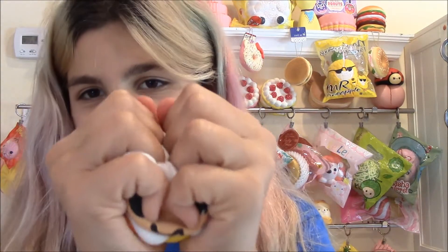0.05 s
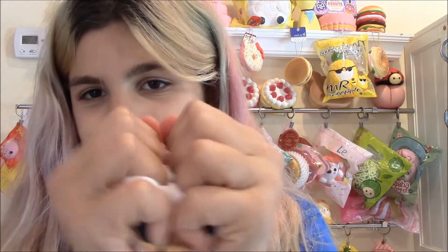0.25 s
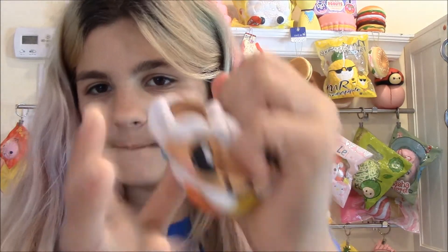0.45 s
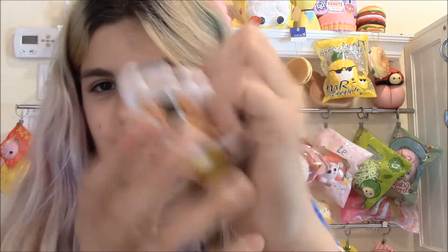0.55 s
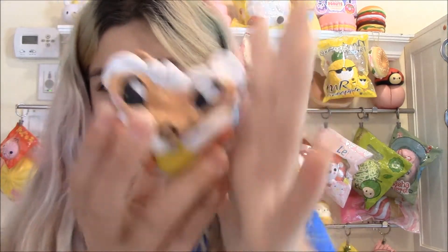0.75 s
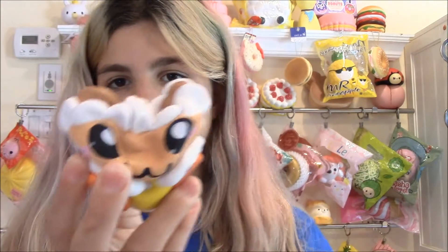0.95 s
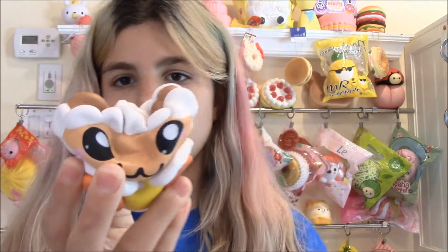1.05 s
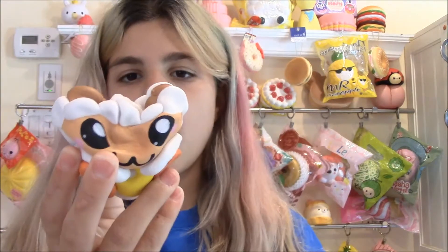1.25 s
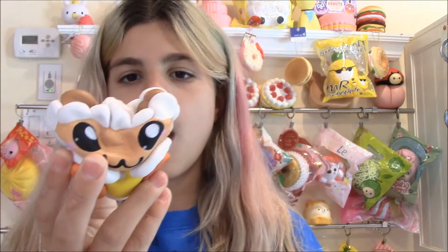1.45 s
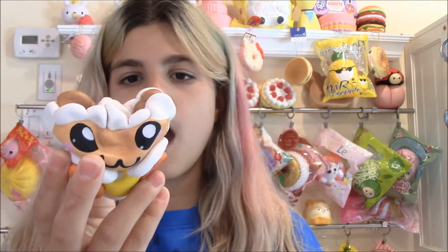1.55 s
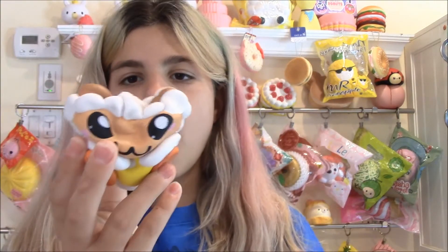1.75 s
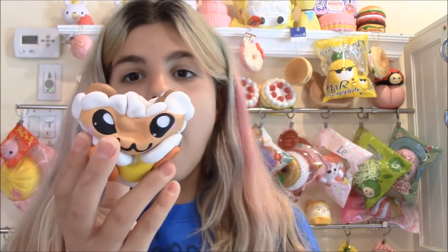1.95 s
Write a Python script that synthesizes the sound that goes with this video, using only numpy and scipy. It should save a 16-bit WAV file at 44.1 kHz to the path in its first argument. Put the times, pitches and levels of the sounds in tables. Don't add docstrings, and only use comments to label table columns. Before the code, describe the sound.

A sticky wet foam toy is squeezed close to the microphone: small clicks and short crackles, one loud sharp snap midway, then a longer fizzy squelch and final press, in a small furnished room with soft hum.

```python
import sys
import numpy as np
from scipy import signal
from scipy.fft import rfft, irfft, next_fast_len
from scipy.io import wavfile
from scipy.ndimage import map_coordinates

SR = 44100
rng = np.random.default_rng(int(sys.argv[2]) if len(sys.argv) > 2 else 0)


def how_loud(loudness_db):
    steps = np.asarray(loudness_db, float) / 20
    return 10 ** steps


def unload_wav(signal):
    wavfile.write(
        sys.argv[1],
        SR,
        np.round(np.clip(np.atleast_2d(signal).T, -1, 1) * 32767).astype(np.int16),
    )


N = 88508
SNAP_N = 1024


def unit(x):
    return x / np.sqrt(np.mean(x ** 2) + 1e-20)


def peak_one(x):
    return x / np.abs(x).max()


def along(points, hz):
    point_hz, value = np.transpose(points)
    return np.interp(np.log(hz + 1), np.log(point_hz + 1), value)


def wobble(rate_hz):
    points = rng.standard_normal(int(N * rate_hz / SR) + 9)
    return map_coordinates(points, [np.arange(N) * rate_hz / SR])


def filtered(x, response):
    size = next_fast_len(x.shape[-1] + 8192)
    hz = np.fft.rfftfreq(size, 1 / SR)
    return irfft(rfft(x, size) * response(hz), size)[..., :x.shape[-1]]


# hz, level_db (per Hz)
HUM_COLOUR = [(20, -36), (70, -11), (250, -1.5), (500, -9), (900, -10), (1800, -19.5), (6000, -27.5),
              (16000, -41)]
# pitch_hz, level_db (rms)
APPLIANCE_TONES = [(5500, -76), (900, -73), (248, -81)]
# hz, likeness (0 to 1)
LEFT_RIGHT_LIKENESS = [(60, 0.53), (240, 0.81), (950, 0.81), (3770, 0.8), (15000, 1)]
HUM_DB = -55


def hum():
    def colour(hz):
        angle = np.arccos(np.clip(along(LEFT_RIGHT_LIKENESS, hz), -1, 1)) / 2
        return how_loud(along(HUM_COLOUR, hz)) * np.array([np.cos(angle), np.sin(angle)])

    mid, side = filtered(rng.standard_normal((2, N)), colour)
    air = unit(np.array([mid + side, mid - side]))
    t = np.arange(N) / SR
    tones = np.zeros(N)
    for hz, db in APPLIANCE_TONES:
        level = how_loud(db + 1.2 * wobble(6.1))
        tones += level * np.sin(2 * np.pi * hz * t + 0.79 * wobble(30))
    return how_loud(HUM_DB + 1.5 * wobble(8.7)) * air + tones


def ring(t, hz, t60_s):
    swell = 1 - np.exp(-t * hz * 3)
    fade = how_loud(-60 * (t / t60_s) ** 1.866)
    return np.sin(2 * np.pi * hz * t) * fade * swell


def crack(pitch_hz):
    centre_hz, width_hz = pitch_hz * 0.99, pitch_hz * 2.15
    t = np.arange(SNAP_N) / SR
    noise = rng.standard_normal(SNAP_N) * how_loud(-60 * t / .0024)

    def around_pitch(hz):
        spread = 1j * hz * width_hz
        return (spread / (centre_hz ** 2 - hz ** 2 + spread)) ** 2

    return peak_one(filtered(noise, around_pitch))


def snap(pitch_hz, cycles, crack_db, thud_db):
    t = np.arange(SNAP_N) / SR
    tone = ring(t, pitch_hz, cycles / pitch_hz)
    thud = ring(t, 620, .006)
    return peak_one(tone + how_loud(crack_db) * crack(pitch_hz) + how_loud(thud_db) * thud)


# start_s, level_db (peak), pitch_hz, thud_db
TICKS = [(.0752, -10, 6230, -35), (.0758, -18, 4930, -18), (0.1727, -21, 6246, -9), (0.5757, -31, 4800, -5),
         (1.0971, -16.5, 9800, -12), (1.1319, -15, 6500, -47), (1.6568, -34.5, 5400, -8),
         (1.67, -44, 5400, -5), (1.6753, -34.5, 9000, -6), (1.686, -32.5, 4700, 3),
         (1.6994, -33.5, 4500, -18), (1.7105, -31, 5470, -1), (1.774, -27.5, 7200, -8),
         (1.7934, -29.5, 5300, -10), (1.9367, -11, 5420, -16.5), (1.9565, -28.5, 8700, -1),
         (1.9762, -21.5, 4960, -4), (1.9953, -18, 6240, -12), (2.0003, -16.5, 6430, -19)]
TICK_DB, TICK_CRACK_DB, TICK_CYCLES = 4.7, 0.5, 10.6


def ticks():
    return [(start_s, how_loud(db + TICK_DB) * snap(hz, TICK_CYCLES, TICK_CRACK_DB, thud_db))
            for start_s, db, hz, thud_db in TICKS]


# start_s, level_db (peak), top_hz
PEELS = [(.0753, -10.5, 11000), (.1729, -19.5, 8900), (0.2666, -25, 5000), (.3096, -22.5, 7000),
         (.4849, -10, 5410), (.5756, -23, 8000), (0.801, -25, 8000), (1.0981, -14, 10980),
         (1.1001, -5, 6890), (1.7744, -20, 13000), (1.7934, -16, 6040), (1.799, -15, 7000),
         (1.9954, -18, 12000)]
PEEL_LOW_HZ = 1100
TABLE_DELAY_S, TABLE_DB = 0.000639, -5


def peel(top_hz):
    def colour(hz):
        no_bass = 1j * hz / (PEEL_LOW_HZ + 1j * hz)
        soft_top = 1 / (1 + 1j * hz / top_hz) ** 2
        table = 1 + how_loud(TABLE_DB) * np.exp(-2j * np.pi * hz * TABLE_DELAY_S)
        return no_bass * soft_top * table

    click = np.eye(1, SNAP_N)[0]
    return peak_one(filtered(click, colour))


def peels():
    return [(start_s, how_loud(db) * peel(top_hz)) for start_s, db, top_hz in PEELS]


# hz, t60_s (time to fade by 60 dB)
ROOM_RING = [(300, 0.28), (1000, 0.28), (3000, 0.24), (7000, 0.2), (14000, 0.18)]
# hz, level_db
ROOM_COLOUR = [(200, -5.5), (1000, -.5), (3000, -2.5), (8000, -3), (15000, -8)]
ROOM_DB, ROOM_WIDTH = -10.5, .1
HANDS_DB, WALL_S = -5.5, .0072


def walls():
    hz, t, noise = signal.stft(rng.standard_normal((2, SR // 3)), SR, nperseg=128)
    fade_db = 60 * t / along(ROOM_RING, hz)[:, None]
    gain = how_loud(along(ROOM_COLOUR, hz)[:, None] - fade_db)
    mid, side = signal.istft(noise * gain, SR, nperseg=128)[1]
    pair = np.array([mid + ROOM_WIDTH * side, mid - ROOM_WIDTH * side]) / np.linalg.norm(mid)
    before_walls = np.arange(len(mid)) < WALL_S * SR
    return how_loud(ROOM_DB + HANDS_DB * before_walls) * pair


# start_s, level_db (fizz), brightness_db (per octave)
PRESSES = [
    [(.235, -75, 19), (.265, -49.5, 2.9), (.3, -46, 8), (.356, -52.5, 9), (.366, -63.5, 17), (.375, -89, 2)],
    [(.44, -76, 13), (.478, -62.5, 6), (.495, -44.5, 3), (.55, -52.5, 6), (.584, -43.5, 10),
     (.597, -73, 11), (.655, -66, 3)],
    [(1.08, -69, 4), (1.089, -33, -7.5), (1.097, -49, 0)],
    [(1.625, -60, 0), (1.68, -45.5, -2), (1.735, -40, -1), (1.775, -41.5, -8), (1.796, -29, 1.2),
     (1.815, -36, -5.5), (1.85, -47, -10), (1.9, -50.5, 0.5)],
    [(1.905, -50, -6), (1.93, -38, -15), (1.955, -33, -1), (1.985, -33, -0.5), (2.007, -32.5, -5)],
]
# hz, level_db (per Hz)
FOAM_COLOUR = [(80, -30.5), (200, -5.5), (650, -2), (1100, 0), (2200, -1.5), (5000, -7.5), (11000, -12.5),
               (16000, -36)]
GRAINS_PER_S, GRAIN_SPREAD_DB, GRAIN_CAP_DB = 900, 3, 9
HISS_SHARE, CLUMP_DB = 0.51, 1.9


def pore_noise():
    chance, size, sign = rng.random((3, N))
    grain_db = np.minimum(-GRAIN_SPREAD_DB * np.log(size + 1e-9), GRAIN_CAP_DB)
    grains = (chance < GRAINS_PER_S / SR) * how_loud(grain_db) * np.sign(sign - .5)
    return np.sqrt(1 - HISS_SHARE) * unit(grains) + np.sqrt(HISS_SHARE) * rng.standard_normal(N)


def foam_tilt(x, db_per_octave):
    return unit(filtered(x, lambda hz: how_loud(along(FOAM_COLOUR, hz)
                                           + db_per_octave * np.log2(hz / 3000 + .01))))


def fizz():
    t, out = np.arange(N) / SR, np.zeros(N)
    for press in PRESSES:
        s, db, brightness = np.transpose(press)
        raw = pore_noise()
        dull, bright = foam_tilt(raw, -3), foam_tilt(raw, 3)
        mix = np.clip(np.interp(t, s, brightness) / 6 + .5, 0, 1)
        edge = np.clip(np.minimum(t - s[0], s[-1] + .004 - t) / .004, 0, 1)
        level = how_loud(np.interp(t, s, db) + CLUMP_DB * wobble(60))
        out += edge * level * ((1 - mix) * dull + mix * bright)
    return out


# start_s, level_db (peak), pitch_hz, crack_db
POPS = [(0.2679, -26.5, 2630, -9), (.2802, -27, 1900, -5), (0.3094, -19.5, 1850, 8),
        (0.3298, -28, 2420, -5), (.345, -30.5, 2430, 8), (0.4855, -24, 1210, -5),
        (0.5087, -22.5, 1100, 3.5), (0.5385, -23.5, 1310, 6), (0.8021, -31, 1430, -0.5),
        (1.0595, -38.5, 1420, -15), (1.0966, -9, 2740, -1), (1.0987, 0, 2560, -9), (1.0992, -3.5, 2700, -1),
        (1.0998, -1, 3055, -0.5), (1.7326, -25, 2260, -12), (1.7988, -22, 600, 2),
        (1.799, -22.5, 2900, -17), (1.8558, -29.5, 2670, -27), (1.925, -41, 900, -22),
        (1.9518, -22, 1690, 2), (1.9675, -23, 2200, 1)]
POP_DB, POP_THUD_DB, POP_CYCLES = 1.2, -10.5, 5.05


def pops():
    return [(start_s, how_loud(db + POP_DB) * snap(hz, POP_CYCLES, crack_db, POP_THUD_DB))
            for start_s, db, hz, crack_db in POPS]


LOW_CUT_HZ = 247
AIR_HZ = 12660
SIDE_DB, PORT_S = -27.5, .00012
FIZZ_ROOM_DB = -1.5


def microphone(hz):
    openings = 1 + how_loud(SIDE_DB) * np.array([[1], [-1]]) * np.exp(-2j * np.pi * hz * PORT_S)
    return openings * (1j * hz / (LOW_CUT_HZ + 1j * hz)) ** 2 / (1 + 1j * hz / AIR_HZ)


def scene():
    out = np.zeros((2, N + SR))
    pores = fizz()
    pieces = [(start_s, x, 0) for start_s, x in ticks() + peels() + pops()]
    pieces += [(k / SR, pores[k:k + 4096], FIZZ_ROOM_DB) for k in range(0, N, 4096)]
    for start_s, x, room_db in pieces:
        heard = how_loud(room_db) * signal.fftconvolve(x[None], walls(), axes=1)
        heard[:, :len(x)] += x
        start = round(start_s * SR)
        out[:, start:start + heard.shape[1]] += heard
    return filtered(out[:, :N], microphone) + hum()


def low_pass(x):
    return signal.sosfilt(signal.butter(12, 17130, fs=SR, output="sos"), x)


def record(dry):
    rounded = dry / (1 + np.abs(dry / .97) ** 8) ** (1 / 8)
    mix = filtered(rounded, lambda hz: 1 / (1 + (hz / 16300) ** 60))
    return low_pass(mix)


dry = scene()
out = record(dry)
unload_wav(out)
```